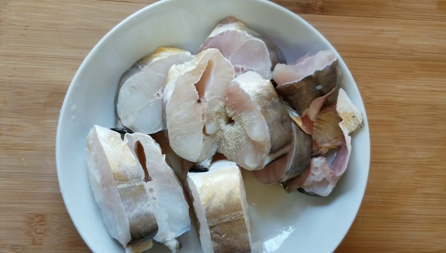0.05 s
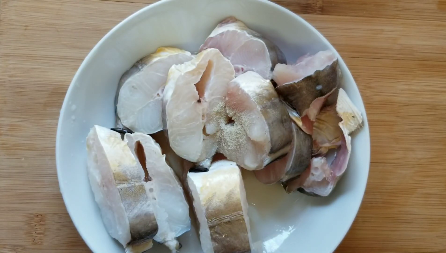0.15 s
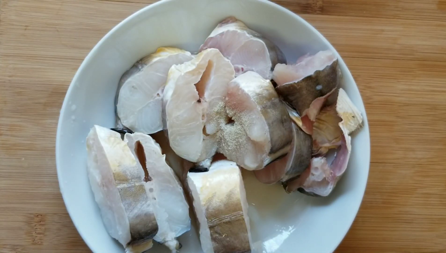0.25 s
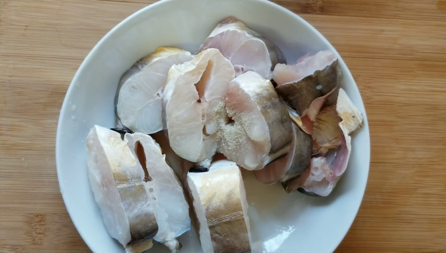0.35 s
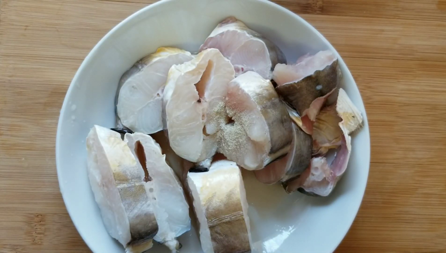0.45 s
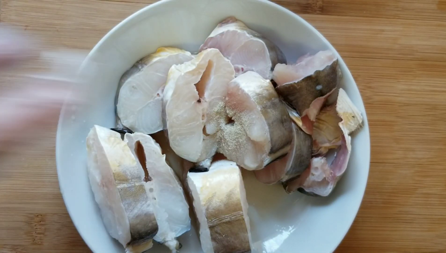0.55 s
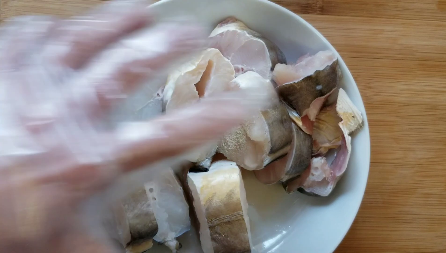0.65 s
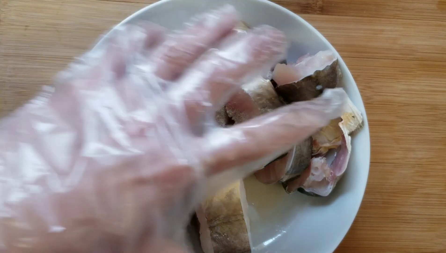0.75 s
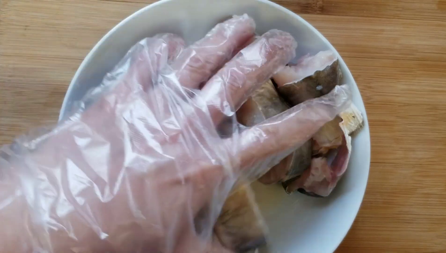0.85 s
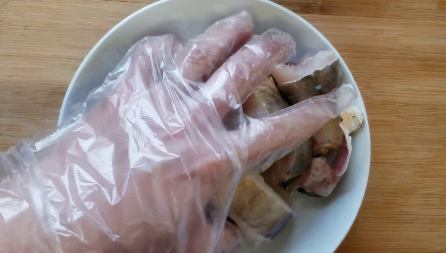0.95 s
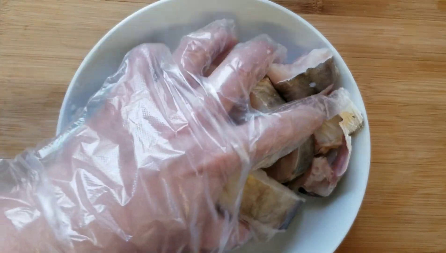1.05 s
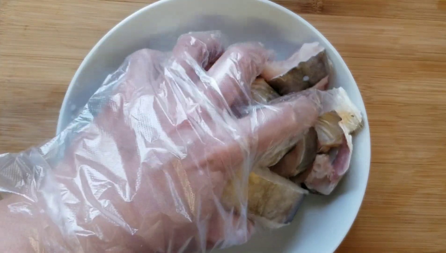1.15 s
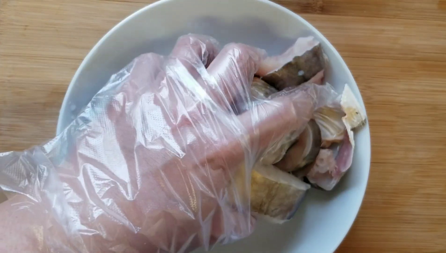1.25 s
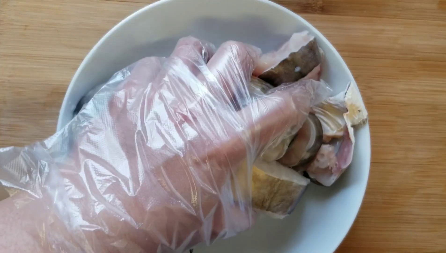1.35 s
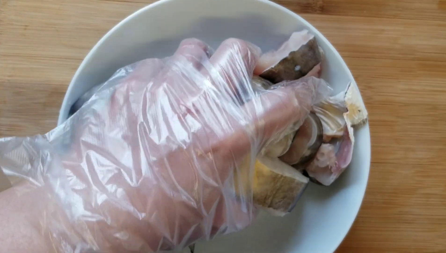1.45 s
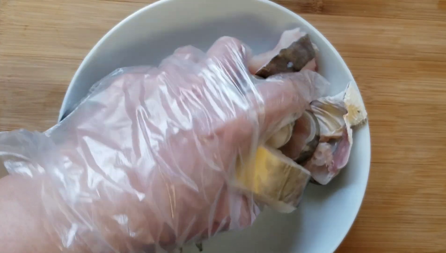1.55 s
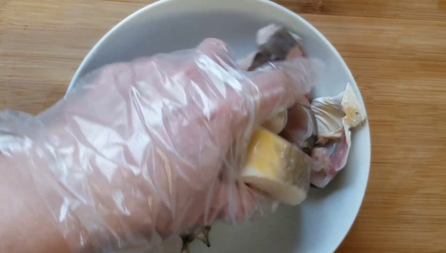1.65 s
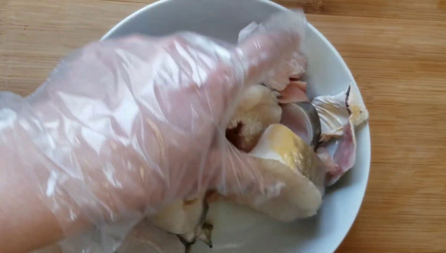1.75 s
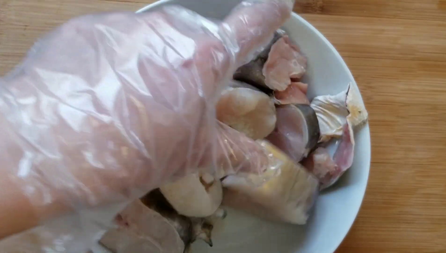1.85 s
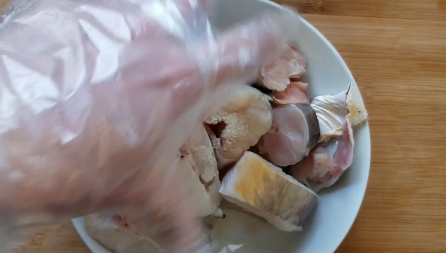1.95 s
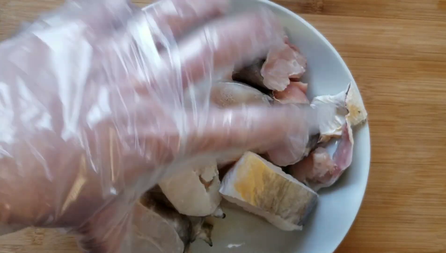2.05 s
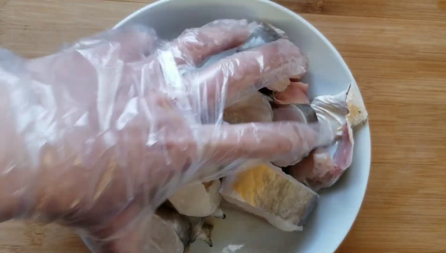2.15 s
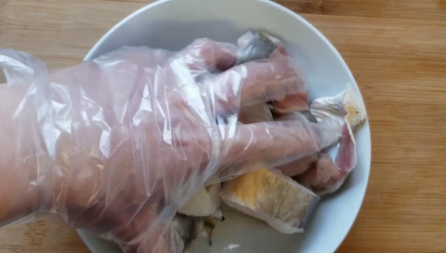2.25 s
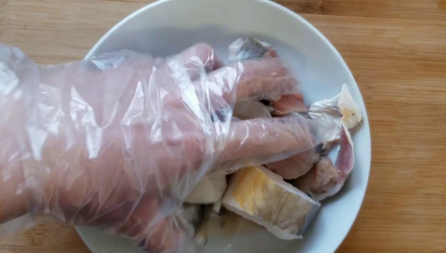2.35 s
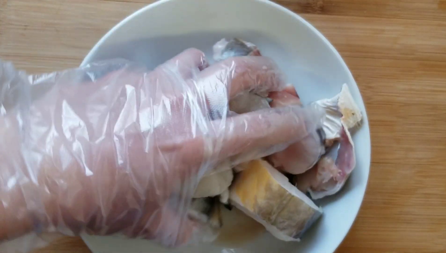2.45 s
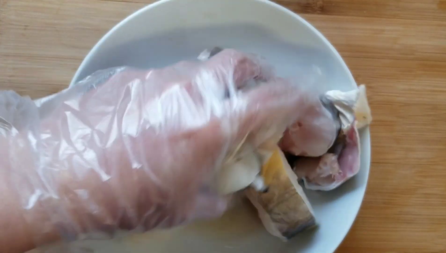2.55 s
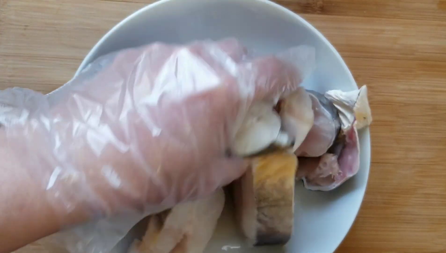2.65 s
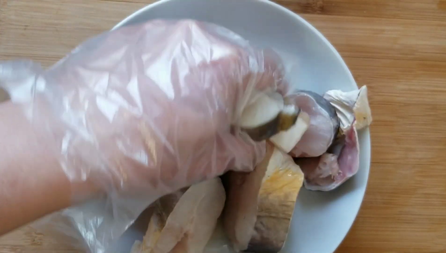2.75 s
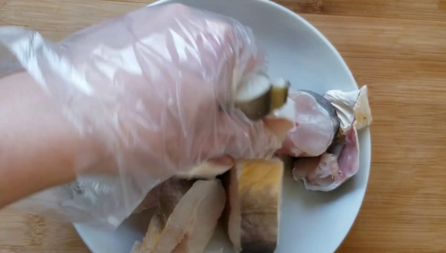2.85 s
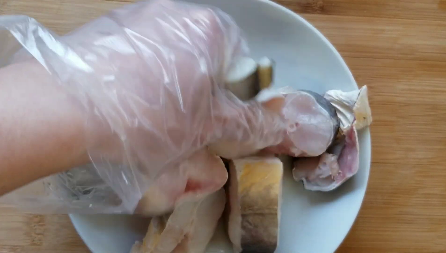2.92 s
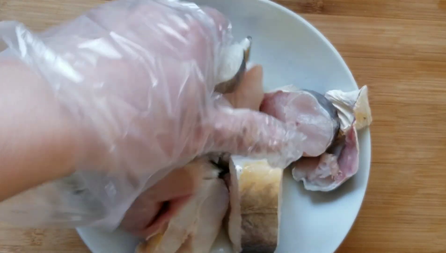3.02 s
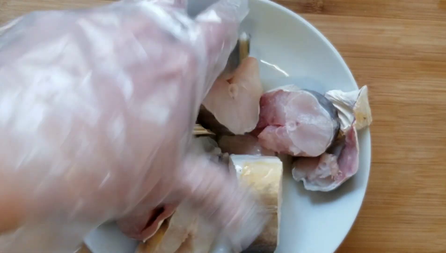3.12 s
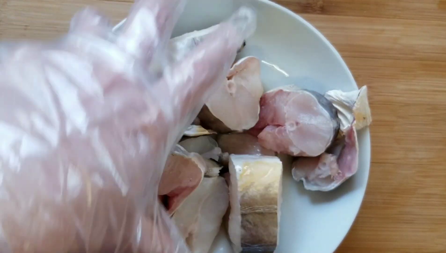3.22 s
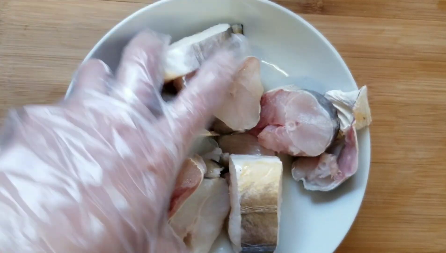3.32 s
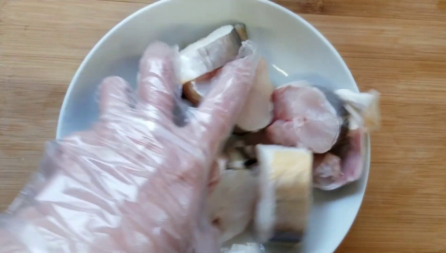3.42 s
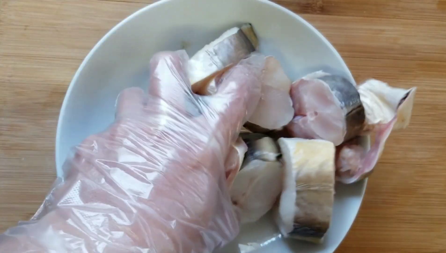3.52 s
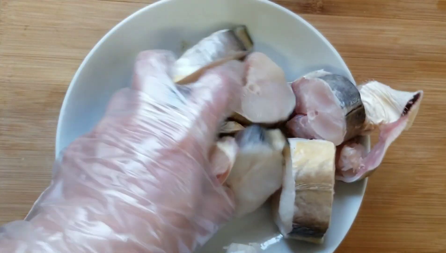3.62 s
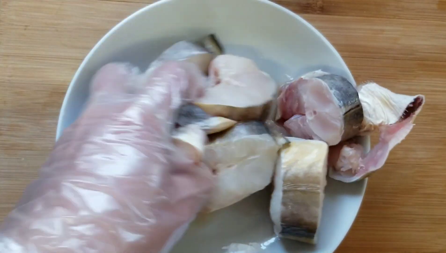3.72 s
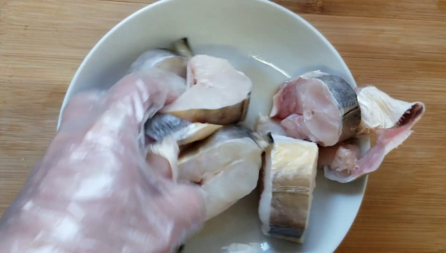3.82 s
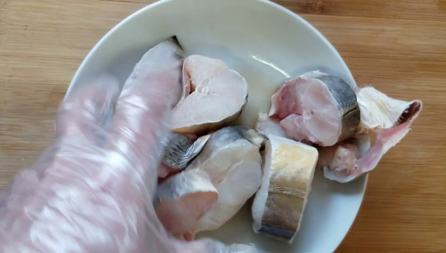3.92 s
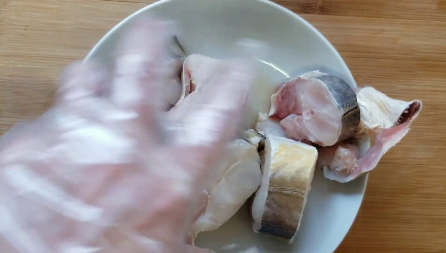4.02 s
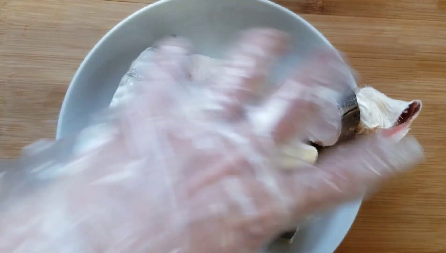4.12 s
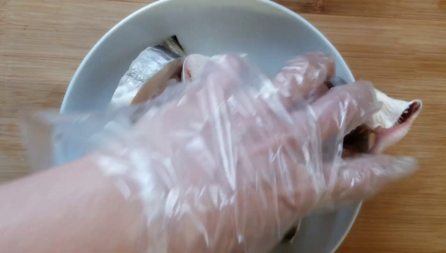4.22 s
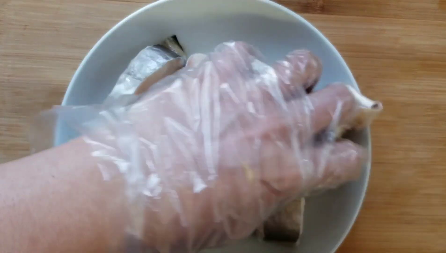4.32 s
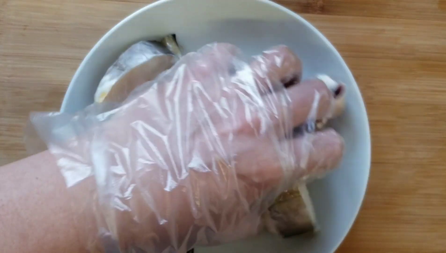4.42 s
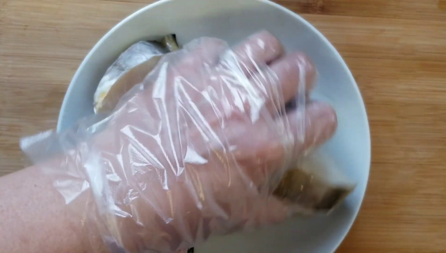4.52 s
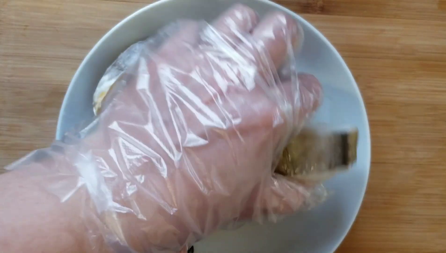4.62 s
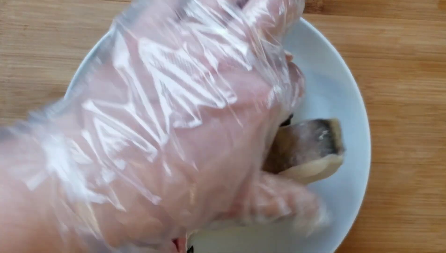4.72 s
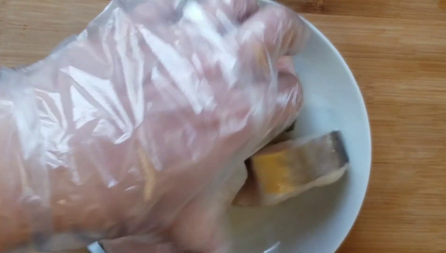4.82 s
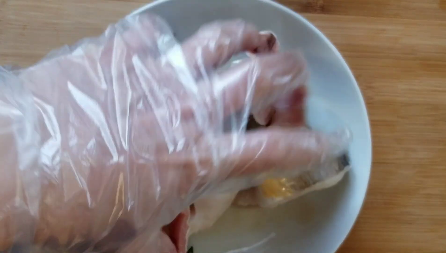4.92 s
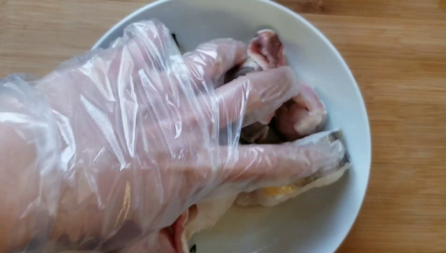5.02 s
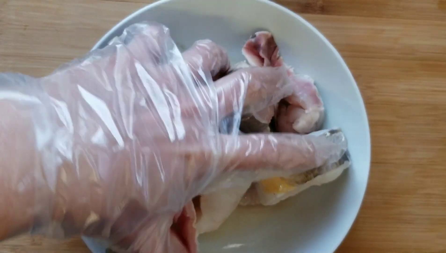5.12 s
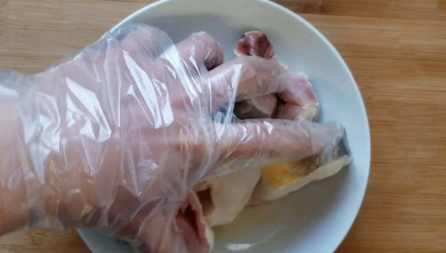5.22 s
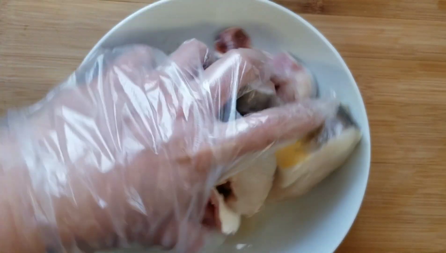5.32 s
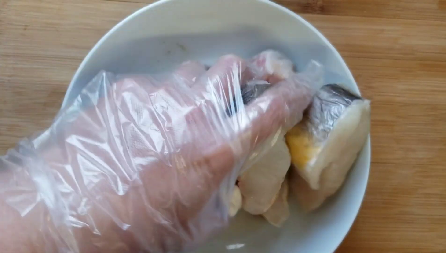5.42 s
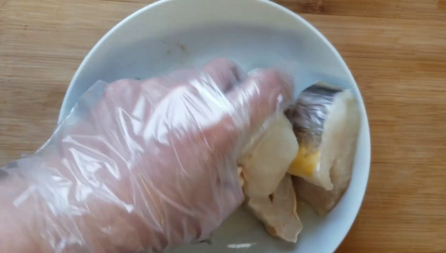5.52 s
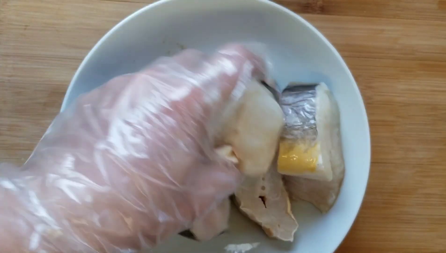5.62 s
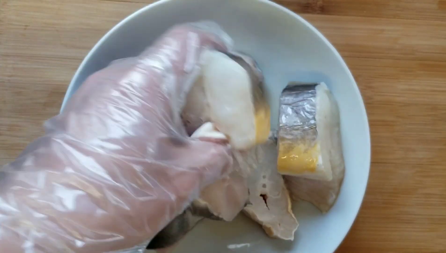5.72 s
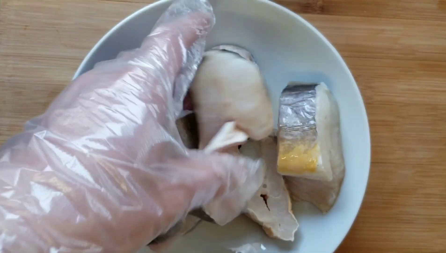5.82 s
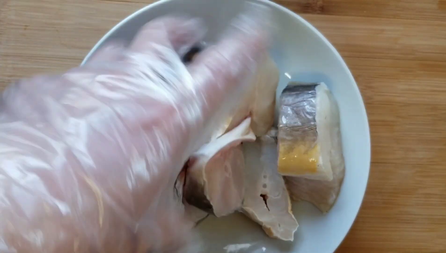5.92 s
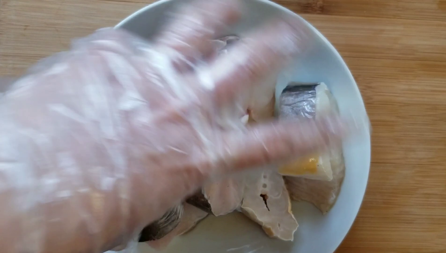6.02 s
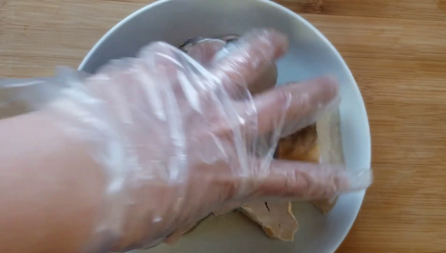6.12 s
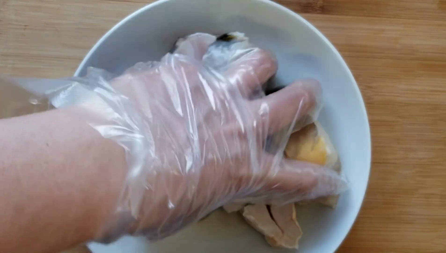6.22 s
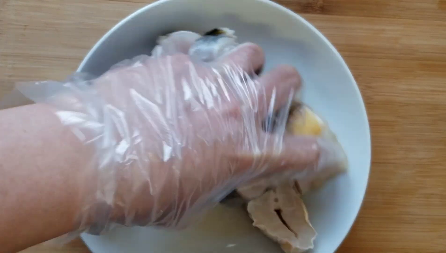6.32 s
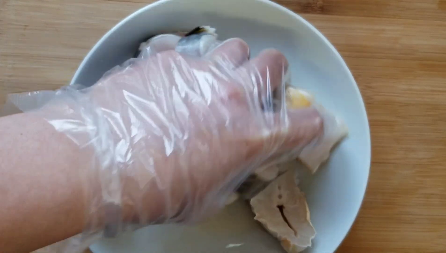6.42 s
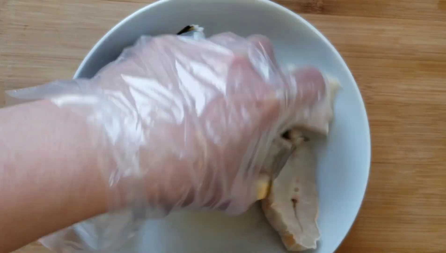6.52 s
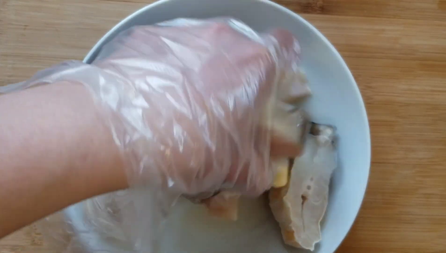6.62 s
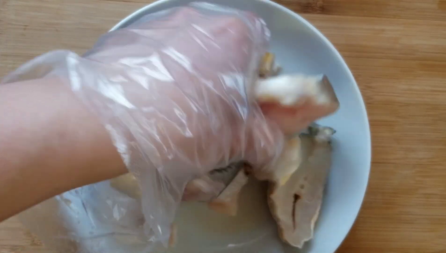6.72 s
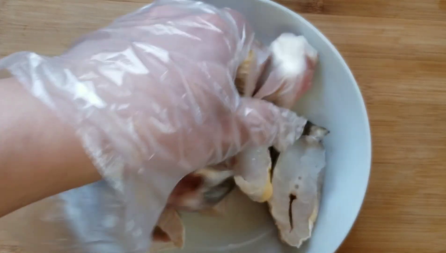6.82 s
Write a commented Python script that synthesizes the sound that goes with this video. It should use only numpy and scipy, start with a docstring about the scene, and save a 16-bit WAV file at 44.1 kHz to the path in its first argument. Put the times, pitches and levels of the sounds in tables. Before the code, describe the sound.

Crackling plastic glove and wet squelching as raw fish is mixed by hand, the plate occasionally knocking on a wooden board.

```python
"""A blow on a worktop rings out in a small hard kitchen, over a low steady rumble.
Then a hand in a thin plastic glove kneads wet fish on a plate, close under a two-port microphone.
Creases of the film buckle in a dense crackle; air pockets in the wet flesh resonate as squelches and pops.
The wooden board groans under the hand, and the plate rocks and knocks on it, ringing in its modes."""
import sys
import numpy as np
from scipy import signal
from scipy.fft import rfft, irfft
from scipy.io import wavfile
from scipy.ndimage import uniform_filter1d

SR = 44100
rng = np.random.default_rng(int(sys.argv[2]) if len(sys.argv) > 2 else 0)


def materialize(psi):
    """Save the field psi as 16-bit PCM at rate SR to the path in sys.argv[1].

    A 1-D psi becomes a single channel; in a 2-D psi each row is a channel.
    """
    bounded = np.clip(np.atleast_2d(psi).T, -1, 1)
    quanta = np.round(bounded * 32767).astype(np.int16)
    wavfile.write(sys.argv[1], SR, quanta)


N = 302526
T = np.arange(N) / SR
HZ = np.fft.rfftfreq(N, 1 / SR)

# the hand between rubs: (time [s], crackle [dB], squelch [dB], left over right [dB])
RESTING_HAND = [(.05, -70.5, -53, 8), (.2, -57, -74, 3), (.55, -55.5, -93, 5), (.8, -53, -63, -0.5),
                (1.4, -49.5, -52.5, 0), (2, -47, -56, 0.5), (3, -43.5, -46.5, 0), (3.95, -49, -64, 0.5),
                (4.24, -56, -69, 0), (4.6, -47, -60, -0.5), (5.2, -45, -53.5, -0.5), (6.86, -45, -55, 0)]
# plate striking board: (time [s], level [dB], dullness [dB/octave], left over right [dB])
PLATE_KNOCKS = [(1.993, -46, -1, 6), (2.2514, -32.5, 4, -1), (2.2969, -24.5, 3, 2), (2.3023, -39, 2.5, -10),
                (2.33, -53, 17, -0.5), (3.198, -34.5, -3.5, 1), (4.3061, -21.5, 1.5, -2),
                (4.3127, -37, 11, -6), (4.634, -48, -5, 8), (4.843, -34.5, -3, 0.0), (4.849, -44, 9, 1),
                (4.869, -31, -4, -1), (5.123, -36.5, 3.7, -1), (5.148, -52, 7, 0), (5.177, -40.5, 7, 0),
                (5.1876, -34, 3, -3), (6.235, -35.5, 1.3, -3), (6.261, -43, 6, -3)]


def gain_of(db):
    """Decibels to an amplitude ratio."""
    return 10 ** (np.asarray(db) / 20)


def unit_rms(x):
    """Normalisation to unit mean power."""
    return x / np.sqrt(np.mean(x ** 2) + 1e-20)


def spectrum(points, hz):
    """Interpolation of a table over log frequency."""
    f, value = np.transpose(points)
    return np.interp(np.log(hz + 1), np.log(f + 1), value)


def curve(rows, column=1):
    """Linear interpolation of one column over time."""
    rows = np.array(rows)
    return np.interp(T, rows[:, 0], rows[:, column])


def sides(db):
    """Left and right gains for a level difference."""
    return gain_of(np.array([db / 2, -db / 2]))


def add(mix, start_s, sound):
    """Superposition of a sound on the mix."""
    part = mix[:, round(start_s * SR):][:, :sound.shape[1]]
    part += sound[:, :part.shape[1]]


def drift(seconds):
    """Low-passed noise: a slow fluctuation of rms 1."""
    span = max(int(seconds * SR), 1)
    return unit_rms(uniform_filter1d(uniform_filter1d(rng.standard_normal(N), span), span))


def ports(a, b, colour):
    """Partial coherence: two signals become a pair of the given spectrum, alike at long wavelengths."""
    # likeness of the ports: (frequency [Hz], correlation [ratio])
    coherence = [(60, 0.95), (130, 0.89), (290, 0.92), (640, 0.85), (1410, 0.63), (3100, 0.21), (6820, 0),
                 (15000, 0.0)]
    same = spectrum(coherence, HZ)
    a, b = rfft(a), rfft(b)
    pair = np.array([a, same * a + np.sqrt(1 - same ** 2) * b])
    return unit_rms(irfft(pair * gain_of(spectrum(colour, HZ)), N))


def ring(modes, dull_db, rise_cycles):
    """Modal synthesis: damped sines build up and decay; a duller blow favours the low ones."""
    hz, db, t60 = np.transpose(modes)[:, :, None]
    t = np.arange(SR // 2) / SR
    decay = gain_of(db - dull_db * np.log2(hz / 800) - 60 * t / t60)
    rise = 1 - np.exp(-t * hz / rise_cycles)
    # each mode reaches the two ports a little apart, high ones more so
    skew = .06 * np.sqrt(hz / 800) * rng.standard_normal((2, len(modes), 1))
    tone = (decay * rise * np.sin(2 * np.pi * (hz * t + skew))).sum(1)
    return tone / abs(tone).max()


def worktop():
    """Free vibration: the opening blow leaves clear modes over a dense dying ring."""
    # clear modes: (frequency [Hz], level [dB], decay by 60 dB [s])
    modes = [(196.6, -2, 0.24), (248, 3, 0.22), (319.5, -12, 0.25), (560, 3, 0.052), (659, -17, 0.41),
             (830, -0.5, 0.077), (800, -3, 0.14), (940, -19, 0.16), (1000, -31, 0.19), (1170, -10, 0.1),
             (1204, 6.5, 0.04), (1187, -13, 0.44), (1420, 2, 0.1), (1513, -13, 0.39), (1530, -18, 0.53),
             (1760, -22, 0.15), (1920, -24, 0.18), (2030, -21, 0.19), (2430, -9, 0.11)]
    # dense ring: (frequency [Hz], level [dB])
    dense_colour = [(60, -24), (200, 2.5), (500, -11.5), (1200, -2.5), (2000, -10.5), (2600, -16.5),
                    (3000, -22), (4000, -38.5)]
    dense_db, dense_t60, modes_db = -25, 0.37, -10
    out = ports(*rng.standard_normal((2, N)), dense_colour) * gain_of(dense_db - 60 * T / dense_t60)
    add(out, 0, gain_of(modes_db) * ring(modes, 0, rise_cycles=0.59))
    return out


def rumble():
    """Background noise of the room, strongest in the bass, its level wavering slightly."""
    # room noise: (frequency [Hz], level [dB])
    colour = [(20, -25), (34, 8), (48, -10), (74, 7), (95, -42), (130, -10), (160, 0), (200, -40),
              (270, -3), (400, -23.5), (800, -26), (1300, -55), (3000, -25.5), (6000, -19), (15500, -30)]
    level_db = -68.5 + 1.9 * drift(0.084)
    return gain_of(level_db) * ports(*rng.standard_normal((2, N)), colour)


def kitchen(x):
    """Reverberation: sparse reflections of random sign, each band dying at its own rate."""
    # decay of the room: (frequency [Hz], reverberation time [s])
    decay_times = [(200, 0.23), (1000, 0.3), (4000, 0.34), (12000, 0.059)]
    reflections = np.zeros((2, SR // 2))
    slots = np.arange(200, SR // 2 - 20, 20)
    arrivals = slots + rng.integers(0, 20, (2, len(slots)))
    np.put_along_axis(reflections, arrivals, rng.choice([-1., 1.], arrivals.shape), 1)
    hz, t, bands = signal.stft(reflections, SR, nperseg=256)
    decay = gain_of(-60 * t / spectrum(decay_times, hz)[:, None])
    tail = signal.istft(bands * decay, SR, nperseg=256)[1]
    return signal.fftconvolve(x, tail / np.linalg.norm(tail[0]), axes=1)[:, :N]


def rubbing(column):
    """Incoherent powers add: level in dB of crackle (1) or squelch (2), a swell for each rub."""
    # finger strokes: (middle [s], length [s], crackle [dB], squelch [dB])
    rubs = [(0.159, 0.081, -50.5, -64), (0.24, 0.053, -56, -68), (0.394, 0.15, -57, -79),
            (0.533, 0.058, -54, -79), (0.648, 0.13, -44, -76), (0.724, 0.062, -48, -56.5),
            (0.907, 0.13, -42, -47.5), (1.067, 0.092, -46, -46), (1.22, 0.2, -43, -47),
            (1.493, 0.071, -44.5, -51.5), (1.59, 0.066, -54, -55), (1.766, 0.15, -43.5, -47),
            (2.031, 0.083, -40, -53), (2.121, 0.071, -44, -53.5), (2.291, 0.11, -42, -43.5),
            (2.452, 0.11, -37.5, -43.5), (2.6, 0.14, -34, -37), (2.777, .18, -42, -44),
            (2.936, 0.055, -43, -47.5), (2.985, .03, -45.5, -50), (3.04, 0.087, -39, -43),
            (3.211, 0.14, -38, -44.5), (3.379, 0.11, -38, -41.5), (3.46, 0.045, -38, -42),
            (3.541, 0.1, -39, -42), (3.688, 0.15, -43, -44.5), (3.886, 0.13, -41, -43.5),
            (4.1, 0.21, -40, -58), (4.342, 0.12, -37.5, -43.5), (4.497, 0.32, -43, -46),
            (4.688, 0.15, -39, -48), (4.89, 0.09, -36, -43), (4.973, 0.037, -43, -47),
            (5.122, 0.23, -43.5, -49), (5.305, 0.068, -37.5, -43.5), (5.407, 0.14, -39, -42),
            (5.49, 0.084, -42, -44.5), (5.57, 0.085, -41.5, -43.5), (5.74, 0.27, -44, -47),
            (5.982, .07, -45, -56), (6.063, 0.16, -43, -51), (6.236, 0.071, -35.5, -37.5),
            (6.344, 0.13, -41, -42), (6.575, 0.31, -50, -48), (6.71, 0.073, -42, -46.5),
            (6.844, 0.13, -37.5, -43.5)]
    start_db, end_db, squareness = -6, -4.5, 2.22
    t = T[::64]
    power = gain_of(2 * curve(RESTING_HAND, column)[::64])
    for middle, length, *db in rubs:
        swell_db = np.where(t < middle, start_db, end_db) * abs(2 * (t - middle) / length) ** squareness
        power += gain_of(2 * (db[column - 1] + swell_db))
    return np.interp(T, t, 10 * np.log10(power))


def clicks(per_s, spread_db, clump_db, clump_s):
    """A Poisson process: random impulses whose unequal sizes swell in clumps."""
    size_db = spread_db * np.minimum(rng.exponential(1, N), 5) + clump_db * drift(clump_s)
    return gain_of(size_db) * (rng.random(N) < per_s / SR)


def buckles(train, t60):
    """Snap-through: at each impulse a crease flips and the film shivers in a decaying noise burst."""
    power = signal.lfilter([1], [1, -gain_of(-2 * 60 / (t60 * SR))], train ** 2)
    return np.sqrt(abs(power)) * rng.standard_normal((2, N))


def glove():
    """Buckling of a thin film: thousands of creases flip as the hand moves; sharp folds stand out."""
    # broad and tight creases: (frequency [Hz], level [dB])
    broad_colour = [(500, -21), (1100, -12), (2000, -11), (3200, -7.5), (4300, -6.5), (6300, -0.24),
                    (7500, -2.5), (8800, -10), (10500, -8.5), (13000, -41)]
    tight_colour = [(5000, -64), (8000, -14), (9500, -7.5), (11000, 0), (12500, 2.5), (14000, 2.5),
                    (15300, 5), (16000, -7)]
    # sharp folds: (time [s], level [dB])
    snaps = [(.2607, -35), (0.434, -30), (0.512, -30), (0.72, -29), (1.9067, -21), (2.11, -32),
             (2.146, -35), (2.2962, -19), (2.458, -25), (2.617, -28), (2.81, -16), (2.929, -22),
             (3.0824, -26), (3.1537, -28), (3.1957, -18), (3.34, -21), (3.447, -24), (3.536, -26.5),
             (4.056, -28), (4.1045, -27), (4.2797, -27), (4.8555, -28), (4.8756, -16), (4.951, -19),
             (5.043, -27), (5.256, -31), (5.2825, -19), (5.6932, -28), (5.891, -30), (5.94, -19),
             (6.303, -27), (6.428, -23), (6.4757, -19.5)]
    broad_flips = clicks(per_s=7700, spread_db=1.5, clump_db=1.25, clump_s=0.013)
    broad = ports(*buckles(broad_flips, t60=0.0055), broad_colour)
    tight_flips = clicks(per_s=4200, spread_db=1.5, clump_db=1.0, clump_s=0.013)
    tight = ports(*buckles(tight_flips, t60=0.0079), tight_colour)
    crackle = (broad + tight * gain_of(3.5)) * gain_of(rubbing(column=1))
    crackle *= sides(curve(RESTING_HAND, column=3))
    times, db = np.transpose(snaps)
    folds = np.zeros((2, N))
    folds[:, np.round(times * SR).astype(int)] = gain_of(db)
    fold_db = np.maximum(spectrum(broad_colour, HZ), spectrum(tight_colour, HZ))
    return crackle + irfft(rfft(buckles(folds, t60=0.0032)) * gain_of(fold_db), N)


def bubble(hz, t60, glide=0):
    """Resonance of an air pocket between wet surfaces: a damped tone; glide raises it as it opens."""
    t = np.arange(2500) / SR
    return np.sin(2 * np.pi * hz * t * (1 + glide * t)) * gain_of(-60 * t / t60) * (1 - np.exp(-t / 0.00051))


def grains(shapes, train):
    """Convolution: each impulse sounds a random shape, a different one at each port."""
    count = len(shapes)
    which = rng.integers(0, count, N)
    return [sum(signal.oaconvolve(train * (which == k), shapes[(k + port) % count])[:N]
                for k in range(count)) for port in range(2)]


def resonate(x, hz, width_hz):
    """A moving resonance by heterodyning: shift hz down to zero, smooth, and shift back."""
    carrier = np.exp(2j * np.pi * np.cumsum(hz) / SR)
    pole = np.exp(-np.pi * width_hz / SR)
    return 2 * (carrier * signal.lfilter([1 - pole], [1, -pole], x / carrier + 1e-18)).real


def fish():
    """Cavity resonance: many small wet bubbles ring in the hollow under the cupped hand."""
    # squelch: (frequency [Hz], level [dB])
    colour = [(400, -23), (800, -11), (1100, -4.5), (1400, 1), (1800, -0.1), (2500, 4.5), (3500, 8),
              (5000, 6.5)]
    # air under the palm: (time [s], resonance [Hz])
    hollow = [(.9, 2200), (1.3, 1920), (1.8, 2220), (2.45, 1800), (2.62, 1640), (2.75, 2120), (2.98, 2480),
              (3.1, 2330), (3.38, 1820), (3.9, 2070), (4.3, 2300), (4.5, 1850), (5.3, 2180), (5.56, 1750),
              (5.8, 2220), (6.1, 2030), (6.27, 1710), (6.42, 1760), (6.7, 2130)]
    pitches = rng.permutation(np.geomspace(500, 4200, 18))
    shapes = [bubble(hz, t60=14 / hz, glide=9.9) * np.sqrt(hz) for hz in pitches]
    openings = clicks(per_s=1500, spread_db=1.0, clump_db=-0.5, clump_s=0.027)
    squelch = ports(*grains(shapes, openings), colour)
    squelch = unit_rms(squelch + .9 * resonate(squelch, curve(hollow), width_hz=350))
    return squelch * gain_of(rubbing(column=2))


def board():
    """Forced vibration: the board groans under the pressing hand and shudders after each knock."""
    # loaded board: (frequency [Hz], level [dB])
    colour = [(20, -30), (35, 3), (70, 8.5), (120, -2), (160, -2.5), (300, -6), (600, -2.5), (1000, -29)]
    # groan from the hand's weight: (time [s], level [dB])
    weight = [(.2, -62), (.42, -69), (.6, -69.5), (1.0, -71.5), (1.6, -74), (1.78, -66.5), (2.15, -60.5),
              (2.45, -57), (2.62, -60), (3.1, -57.5), (3.3, -63), (3.46, -56.5), (3.6, -67.5), (4.2, -66),
              (4.6, -67.5), (5.4, -59.5), (5.8, -66), (5.9, -63), (6.06, -57), (6.17, -60), (6.6, -61),
              (6.8, -66), (6.86, -50)]
    shudder_db, t60, rise_s = -21.5, 0.25, 0.011
    shudder = gain_of(shudder_db - 60 * T[:SR] / t60) * (1 - np.exp(-T[:SR] / rise_s))
    load = gain_of(curve(weight))[None]
    for start_s, db, _, _ in PLATE_KNOCKS:
        add(load, start_s, gain_of(db) * shudder[None])
    return ports(*rng.standard_normal((2, N)), colour) * load


def pops():
    """Rupture and resonance: a film of juice tears with a smack, and the pocket it leaves pings."""
    # wet pops: (time [s], level [dB], pitch [Hz], decay by 60 dB [s], left over right [dB])
    ruptures = [(1.8028, -35, 3200, 0.033, 1.5), (1.8942, -26.5, 2230, 0.031, 4),
                (1.8995, -41, 2270, .025, 0), (2.1106, -39, 1880, .015, 1), (2.3973, -38, 2970, .03, 4),
                (2.572, -34, 1630, .025, 1), (2.612, -28.5, 1685, 0.059, 2.5),
                (2.6246, -28, 1760, 0.071, 4), (2.81, -33.5, 1960, 0.04, -2), (3.378, -35, 1830, 0.035, 10),
                (3.3894, -34, 1900, .03, 1.5), (3.4471, -34, 3490, 0.04, 0), (3.534, -35, 2700, 0.03, 0),
                (5.5484, -33, 1760, 0.055, 1.5), (5.8342, -33, 1740, 0.023, -2),
                (5.8522, -27, 1800, 0.015, 2), (6.2385, -31, 1650, .013, -3),
                (6.2515, -32, 1400, 0.018, -2), (6.2594, -28, 1900, 0.024, -1),
                (6.28, -28, 1590, 0.021, -4), (6.302, -31, 1600, 0.019, -2), (6.317, -36, 1460, .02, -2),
                (6.3612, -28.5, 1460, 0.022, -1), (6.364, -25.5, 1930, 0.0043, -4),
                (6.388, -38, 1600, .015, -5)]
    smack_share = 0.43
    out = np.zeros((2, N))
    for start_s, db, hz, t60, pan_db in ruptures:
        smack = bubble(1.14 * hz, t60=0.014) + bubble(hz, t60=0.0021)
        pop = (1 - smack_share) * bubble(hz, t60, glide=1.6) + smack_share * smack
        add(out, start_s, gain_of(db) * sides(pan_db)[:, None] * pop / abs(pop).max())
    return out


def plate():
    """Impact excitation: the rocking plate knocks on the board and rings in its modes."""
    # plate on board: (frequency [Hz], level [dB], decay by 60 dB [s])
    modes = [(66, -6, 0.1), (156.3, -6, 0.17), (200, -5.5, 0.13), (267, -19.5, 0.62), (314, -1.5, 0.087),
             (502, -1.5, 0.1), (664, 3, 0.081), (758, 18.5, 0.0081), (817, 11, 0.036), (926, 6.5, 0.04),
             (1020, 9, 0.012), (2230, -37, 0.021), (2950, 1.5, 0.084), (3700, -7, 0.14)]
    out = np.zeros((2, N))
    for start_s, db, dull_db, pan_db in PLATE_KNOCKS:
        add(out, start_s, gain_of(db) * sides(pan_db)[:, None] * ring(modes, dull_db, rise_cycles=1.0))
    return out


def scene():
    """Direct and reverberant sound add; the hand's acoustic shadow shades the pops from the room."""
    shadow_db, room_db = -11, -12
    near = glove() + fish() + plate() + board()
    shaded = pops()
    background = rumble()
    room = kitchen(near + gain_of(shadow_db) * shaded)
    return near + shaded + gain_of(room_db) * room + worktop() + background


def record(dry):
    """Frequency response of the microphone: the two ports differ in colour, and the band is limited."""
    # port imbalance: (frequency [Hz], left over right [dB])
    imbalance = [(60, 2.5), (99, 3), (160, 1), (270, 1), (450, 2.5), (740, 1.5), (1220, 1.5), (2010, 2.0),
                 (3330, -1), (5500, 5), (9080, -0.5), (15000, 4.5)]
    cutoff_hz = 15510
    coloured = irfft(rfft(dry) * sides(spectrum(imbalance, HZ)), N)
    lowpass = signal.firwin(2047, cutoff_hz, window=("kaiser", 9), fs=SR)
    return signal.oaconvolve(coloured, lowpass[None], "same")


dry = scene()
out = record(dry)
materialize(out)
```